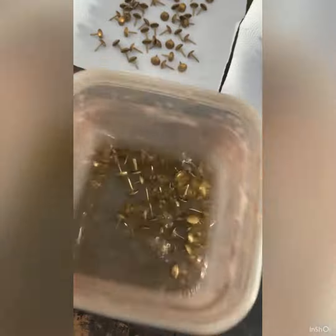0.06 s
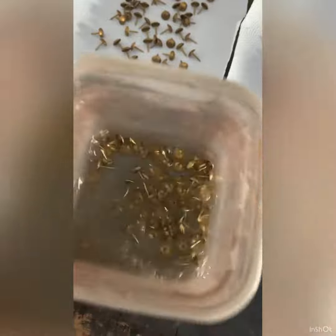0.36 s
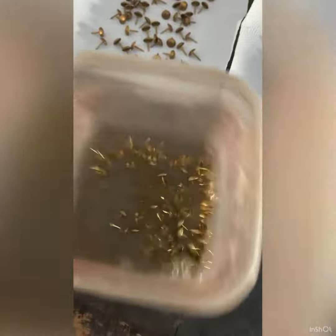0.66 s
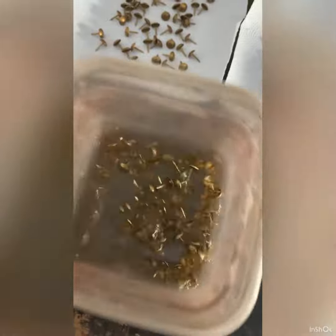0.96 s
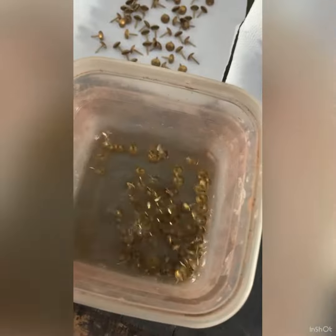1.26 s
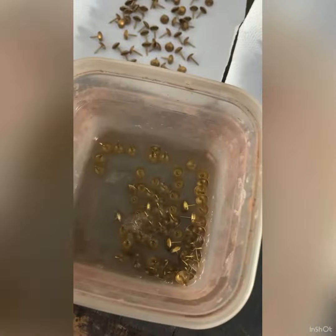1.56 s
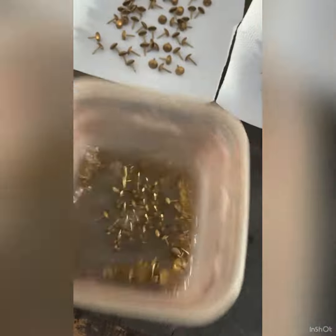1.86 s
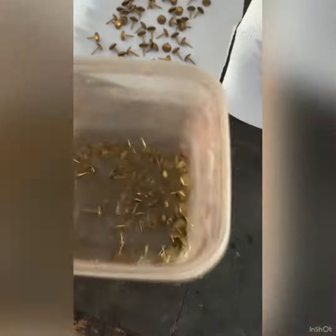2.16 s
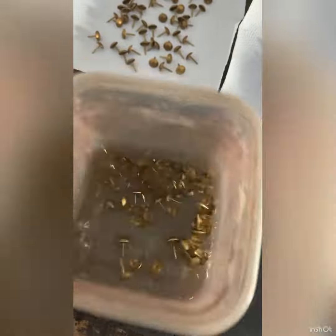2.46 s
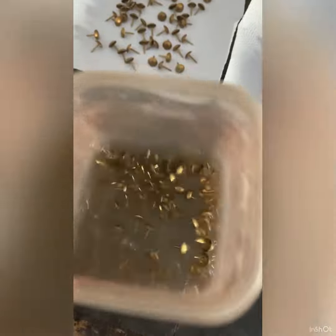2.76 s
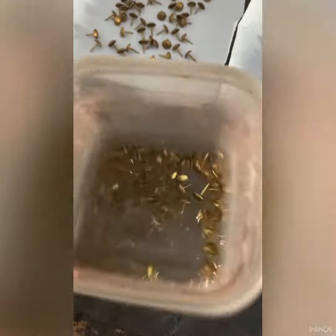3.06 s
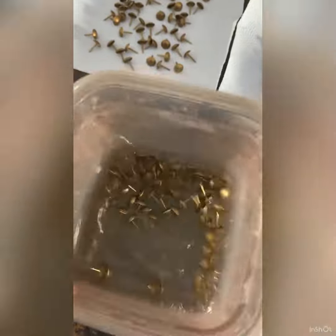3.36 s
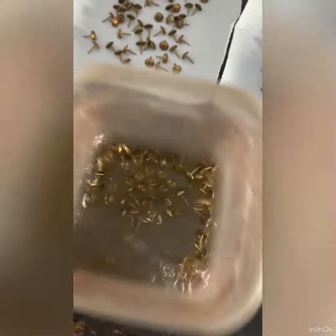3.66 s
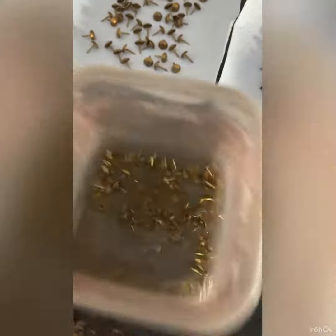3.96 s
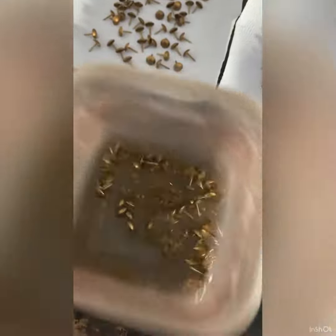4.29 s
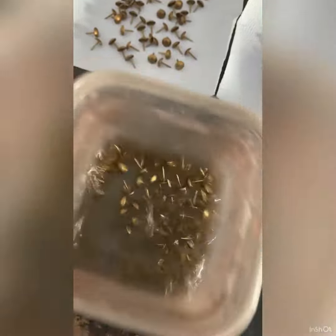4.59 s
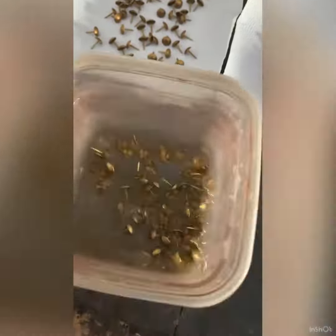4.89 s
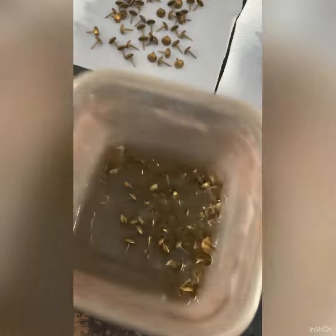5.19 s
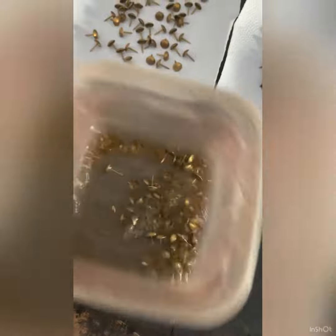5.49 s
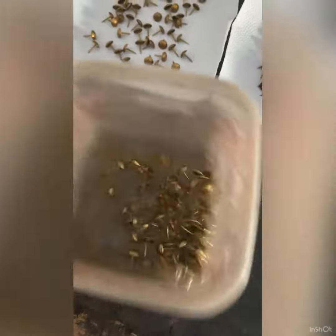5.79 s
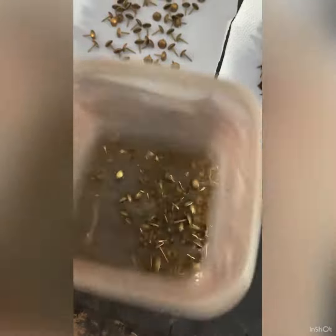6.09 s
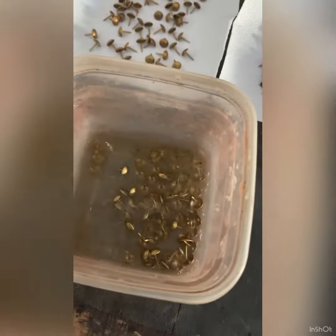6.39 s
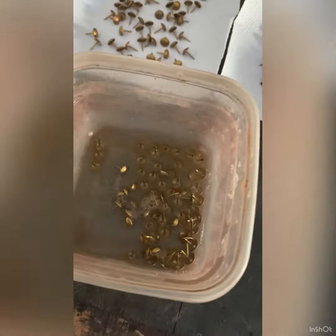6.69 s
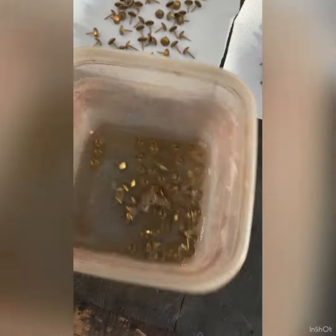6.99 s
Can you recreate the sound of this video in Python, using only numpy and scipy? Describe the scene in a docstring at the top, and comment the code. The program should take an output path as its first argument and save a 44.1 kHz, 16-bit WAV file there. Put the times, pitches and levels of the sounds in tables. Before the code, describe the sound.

Close to the microphone, small metal tacks in a little liquid are shaken quickly to and fro in a plastic tub. They tinkle against each other, drum on the plastic and churn up bubbles. The shaking pauses briefly with a few settling ticks, resumes for a longer spell, then stops as the last tacks settle. A workshop hums faintly behind.

```python
"""A workshop, humming faintly. Close to a two-port stereo microphone, a plastic tub of small metal
tacks in a little liquid is shaken to and fro, rested, shaken again and rested. At every turn the heap
surges against a wall: tacks tinkle on each other, drum on the plastic and churn up bubbles.
In the pauses the last tacks settle with faint ticks. A short room tail sits behind the direct sound."""
import sys
import numpy as np
from scipy import signal
from scipy.fft import rfft, irfft, next_fast_len
from scipy.io import wavfile

SR = 44100
rng = np.random.default_rng(int(sys.argv[2]) if len(sys.argv) > 2 else 0)


def generate_wav(signal):
    """Clip the signal to [-1, 1] and save it as 16-bit WAV at the path in sys.argv[1]."""
    frames = np.transpose(np.atleast_2d(signal))
    scaled = np.clip(frames, -1, 1) * 32767
    pcm = np.round(scaled).astype(np.int16)
    wavfile.write(sys.argv[1], SR, pcm)


N = 310464

# modes of a wet tack: pitch_hz, width_hz, energy_db
TACK_MODES = [(3873, 130, -4), (5240, 2100, -16), (5535, 120, 0.5), (6140, 210, 6.5), (6920, 420, -2),
              (8040, 260, -4.5), (9200, 530, -31.5), (9830, 130, -4.5), (10780, 580, -5),
              (12070, 460, -8.5), (14300, 500, -10), (14800, 700, -8.5)]


def amp(db):
    """Decibels to amplitude."""
    return 10 ** (np.asarray(db) / 20)


def unit(x):
    """Scale to rms 1."""
    return x / np.sqrt(np.mean(x ** 2) + 1e-20)


def peaked(x):
    """Scale to peak 1."""
    return x / np.abs(x).max()


def along(points, hz):
    """Read a curve of (hz, value) points on a log frequency axis."""
    point_hz, values = np.transpose(points)
    return np.interp(np.log(hz + 1), np.log(point_hz + 1), values)


def filtered(x, response):
    """Apply a complex frequency response."""
    size = next_fast_len(N + SR // 2)
    return irfft(rfft(x, size) * response(np.fft.rfftfreq(size, 1 / SR)), size)[..., :N]


def rolled_off(wave, kind, edge_hz):
    """A gentle low-pass or high-pass."""
    return signal.lfilter(*signal.butter(2, min(edge_hz, SR / 3), kind, fs=SR), wave)


def noise(spectrum):
    """Noise of rms 1, coloured by (hz, db) points."""
    return unit(filtered(rng.standard_normal(N), lambda hz: amp(along(spectrum, hz))))


def add(track, start_s, sound):
    """Mix a sound into the track."""
    part = track[..., max(round(start_s * SR), 0):][..., :sound.shape[-1]]
    part += sound[..., :part.shape[-1]]


def workshop():
    """Room tone: steady rumble, mostly common to both ports, with hiss and a machine hum."""
    # colour of the room rumble: frequency_hz, relative_db
    air_colour = [(25, -15.5), (55, -1), (105, 3), (190, -8.5), (315, 4), (600, -12), (1800, -16.5),
                  (3200, -23.5), (5000, -66), (9000, -69.5)]
    # tones of the machine: pitch_hz, level_db
    hum_tones = [(59.2, -64), (134, -65)]
    hiss_colour = [(100, -0.5), (1500, 18.0), (3500, 2.5), (6000, -5.0), (15000, -23.5)]
    t = np.arange(N) / SR
    air = noise(air_colour) + amp(-8.5) * np.array([noise(air_colour), noise(air_colour)])
    hiss = np.array([noise(hiss_colour), noise(hiss_colour)])
    hum = sum(amp(db) * np.sqrt(2) * np.sin(2 * np.pi * hz * t) for hz, db in hum_tones)
    return amp(-58.5) * air + amp(-65.5) * hiss + hum


def hand(hold_db=-65, grip_db=-49, grip_s=1.76, half_length_s=0.082):
    """The hand rumbles faintly on the tub, and louder as a new grip flexes it."""
    t = np.arange(N) / SR
    flex = amp(hold_db) + amp(grip_db) / (1 + ((t - grip_s) / half_length_s) ** 2)
    return flex * noise([(25, -11.0), (55, -2.0), (80, 3.5), (160, 1.0), (260, -7), (800, -59.5)])


def room(near, block=8192):
    """A short diffuse tail, different at each port and from moment to moment; bass lasts longest."""
    # decay of the room: frequency_hz, t60_s
    decay_times = [(200, 1.3), (2000, 0.37), (6000, 0.13), (15000, 0.34)]
    # the tail against the direct sound: frequency_hz, level_db
    tail_levels = [(200, -21.5), (800, -14.5), (1300, -15), (1800, -2), (3000, -9), (5000, -47),
                   (12000, -21)]
    sent = filtered(near.mean(axis=0), lambda hz: amp(along(tail_levels, hz)))
    out = np.zeros((2, N))
    for at in range(0, N, block):
        hz, t, spectra = signal.stft(rng.standard_normal((2, SR // 2)), SR, nperseg=256)
        decay = amp(-60 * t / along(decay_times, hz)[:, None])
        tail = signal.istft(spectra * decay, SR, nperseg=256)[1]
        tail /= np.linalg.norm(tail[0])
        add(out, at / SR, signal.fftconvolve(sent[None, at:at + block], tail, axes=1))
    return out


def ports(near):
    """The direct sound reaches the two microphone ports at different times and strengths."""
    # phase between the ports: frequency_hz, left_lead_rad
    phases = [(0, 0), (1000, -1.2), (1200, -.65), (1650, -.4), (2400, 1.8), (3500, 1.4), (4600, 3.14),
              (6900, 6.28), (8900, 9.42), (11100, 12.57), (13200, 15.7), (16400, 20.3)]
    # balance of the ports: frequency_hz, left_minus_right_db
    balance = [(100, -1.5), (700, -1), (1050, -4.5), (1250, 1.5), (1800, -7), (3000, 0), (4400, -0.5)]

    def left(hz):
        return amp(along(balance, hz) / 2) * np.exp(0.5j * np.interp(hz, *np.transpose(phases)))

    return filtered(near, lambda hz: np.array([left(hz), 1 / left(hz)]))


def damped(modes, factor):
    """The same modes, dying faster (factor above 1) or slower."""
    return [(hz, width * factor, db) for hz, width, db in modes]


def ring(modes, detune, scatter_db, walls_db, walls_t60_s, size=1500):
    """One contact, energy 1: each spot that is struck gives the modes new strengths, signs and pitches."""
    hz, width, db = np.transpose(modes)[:, :, None]
    pitch, level, side = rng.standard_normal((3, len(modes), 1))
    t = np.arange(size) / SR
    strength = np.sign(side) * amp(db + scatter_db * level) * np.sqrt(width)
    tones = np.cos(2 * np.pi * hz * np.exp(detune * pitch) * t)
    wave = np.sum(strength * np.exp(-np.pi * width * t) * tones, axis=0)
    # bounces between the tub's close walls smear the sound; a small part differs from port to port
    bounces = rng.standard_normal(size) + amp(-13) * rng.standard_normal((2, size))
    bounces *= amp(-60 * t / walls_t60_s)
    smear = signal.fftconvolve(wave[None], bounces / np.linalg.norm(bounces[0]), axes=1)[:, :size]
    return unit(wave + amp(walls_db) * smear) / np.sqrt(size)


def crack(t60_s, edge_hz=3200, size=1500):
    """The dry snap of a point striking a head, energy 1."""
    burst = rng.standard_normal(size) * amp(-60 * np.arange(size) / SR / t60_s)
    burst = rolled_off(rolled_off(burst, "high", edge_hz), "low", edge_hz=13000)
    return burst / np.linalg.norm(burst)


def soft_tick():
    """A tack under the liquid tips against its neighbour: choked ring, weak snap, dulled top."""
    choked = ring(damped(TACK_MODES, 1.8), detune=0.037, scatter_db=6, walls_db=4, walls_t60_s=0.028)
    snap = amp(-9.5) * crack(t60_s=0.007)
    return peaked(rolled_off(choked + snap, "low", edge_hz=12000))


def settling(faint_per_s=8, faint_db=-60, spread_db=4):
    """Ticks of the resting heap, and fainter ones at random throughout as loose tacks tip over."""
    # the heap settles or stirs: start_s, level_db
    ticks = [(1.3, -25), (1.311, -30), (1.331, -38), (1.377, -53), (1.405, -50), (1.414, -45), (1.433, -44),
             (1.496, -46), (1.518, -48), (1.722, -39.5), (1.76, -33), (6.365, -28), (6.385, -27),
             (6.398, -28), (6.4363, -33), (6.4574, -37), (6.511, -42), (6.517, -47), (6.612, -48),
             (6.617, -44), (6.751, -51), (6.802, -48), (6.899, -58), (6.966, -42), (6.987, -37),
             (7.01, -32)]
    out = np.zeros((2, N))
    for start_s, db in ticks:
        add(out, start_s, amp(db) * soft_tick())
    for at in np.flatnonzero(rng.random(N) < faint_per_s / SR):
        add(out, at / SR, amp(faint_db + spread_db * rng.standard_normal()) * soft_tick())
    return out


def sliding(steady_db=-30, stir_db_per_s=319.5):
    """Power of tacks sliding over the bottom: steady while shaken, quick to start, slower to settle."""
    # spells of shaking: start_s, stop_s, settle_db_per_s
    spells = [(-.2, 1.201, 164.5), (1.821, 6.202, 112.5)]
    t = np.arange(N) / SR
    drops_db = [stir_db_per_s * np.maximum(start - t, 0) + settle * np.maximum(t - stop, 0)
                for start, stop, settle in spells]
    return amp(steady_db - np.min(drops_db, axis=0)) ** 2


def surge(start_s, rise_s, db, sharpness=1.304):
    """Power of the heap running into a wall: it piles up in the rise time, then ebbs."""
    age = (np.arange(SR // 3) / SR - min(start_s, 0)) / rise_s
    return (amp(db) * (age * np.exp(1 - age)) ** sharpness) ** 2


def shaking(slide_drum_db=-3, back_drum_db=-4.5, back_rise_s=0.025, drum_lead_s=0.0077):
    """Power of the tinkling and of the drumming: sliding, plus a surge at each push and swing back."""
    # one row per to-and-fro of the hand, about 5.5 a second; drum levels are plastic against tacks:
    # start_s, push_rise_s, push_db, back_delay_s, back_db, push_drum_db
    shakes = [(-0.035, 0.031, -23, 0.1, -23, -1), (0.146, 0.039, -24, 0.1, -24.5, -3.5),
              (0.314, 0.042, -25.5, 0.12, -23.5, -4), (0.497, 0.039, -23.5, 0.1, -19.5, -2.5),
              (0.668, 0.048, -24, 0.1, -23.5, -0.5), (0.84, 0.046, -27, 0.098, -23.5, -2),
              (1.014, 0.031, -24.5, 0.081, -26, -5.5), (1.802, 0.033, -29, 0.11, -28.5, -2.5),
              (1.985, 0.04, -20.5, 0.1, -24.5, -4), (2.154, 0.043, -18.5, 0.13, -29, -5.5),
              (2.329, 0.047, -21.5, 0.12, -26, -5), (2.51, 0.035, -21, 0.11, -29.5, -3.5),
              (2.695, 0.039, -20.5, 0.099, -35, -5), (2.885, 0.042, -21, 0.088, -27, -2),
              (3.055, 0.044, -24.5, 0.11, -25.0, -4), (3.242, 0.042, -20.5, 0.12, -23, -4.5),
              (3.43, 0.045, -20, 0.11, -23.5, -8), (3.611, 0.044, -19.5, 0.11, -24.5, -4),
              (3.787, 0.047, -23.5, 0.13, -29.5, -4), (3.974, 0.043, -22, 0.12, -23, -4.0),
              (4.153, 0.036, -25, 0.1, -24.5, -1), (4.321, 0.043, -21, 0.12, -22.5, -5),
              (4.503, 0.049, -23.5, 0.109, -28.5, -4.5), (4.686, 0.045, -21, 0.12, -23.5, -5),
              (4.882, 0.035, -22.5, 0.11, -22, -3), (5.069, 0.039, -22.5, 0.11, -23, -3.5),
              (5.267, 0.048, -24, 0.11, -28, -4.5), (5.445, 0.041, -23.0, 0.11, -22, -4.5),
              (5.634, 0.053, -25.5, 0.103, -23, -3), (5.803, 0.05, -22, 0.12, -26.5, -4.5),
              (5.98, 0.038, -24.5, 0.1, -24.5, -2.5), (6.153, 0.035, -27, 0.11, -37.5, -2),
              (7, 0.057, -35.5, 0.1, -26.0, -3)]
    tinkle = sliding()
    drum = tinkle * amp(slide_drum_db) ** 2
    for start_s, push_rise_s, push_db, back_delay_s, back_db, push_drum_db in shakes:
        push = (start_s, push_rise_s, push_db, push_drum_db)
        swing_back = (start_s + back_delay_s, back_rise_s, back_db, back_drum_db)
        for stroke_s, rise_s, db, drum_db in (push, swing_back):
            add(tinkle, stroke_s, surge(stroke_s, rise_s, db))
            wall_s = stroke_s - drum_lead_s  # the front of the heap meets the wall before the rest
            add(drum, wall_s, surge(wall_s, rise_s, db + drum_db))
    return tinkle, drum


def bubble(hz, cycles, glide):
    """One bubble: a soft start, then its pitch rises as it dies."""
    turns = hz * np.arange(SR // 16) / SR
    age = turns / cycles
    tone = np.sin(2 * np.pi * turns * (1 + glide * np.minimum(age, 1)))
    return tone * amp(-40 * age) * (1 - np.exp(-turns))


def slosh(power, middle_hz=779, spread=0.368, count=1300):
    """Bubbles of many sizes, as loud as the liquid is stirred, and a few loud ones where it slaps a wall."""
    # bubbles that stand out: start_s, pitch_hz, level_db
    plops = [(0.185, 1163, -12), (0.52, 900, -15.5), (0.859, 900, -14), (2.534, 1027, -13.5),
             (2.893, 960, -8.5), (3.457, 850, -15), (4.532, 910, -6.5), (4.556, 490, -21.5),
             (4.907, 830, -14), (5.115, 400, -24.5), (5.318, 426, -23.5), (5.851, 1106, -17),
             (5.93, 2400, -14.5)]
    fizz = np.zeros(N)
    for at, (pitch, level) in zip(rng.integers(N, size=count), rng.standard_normal((count, 2))):
        hz = middle_hz * np.exp(spread * np.clip(pitch, -2, 2))
        add(fizz, at / SR, amp(5 * level) * bubble(hz, cycles=15.8, glide=0.19))
    out = amp(-15.5) * unit(fizz) * np.sqrt(power)
    for start_s, hz, db in plops:
        add(out, start_s, amp(db) * bubble(hz, cycles=23.5, glide=0.045))
    return out


def rattle(power, contacts, rate, spread_db, crowding):
    """Random collisions, `rate` a second at mean power; a livelier heap hits more often and harder."""
    chance = np.clip(rate / SR * (power / power.mean()) ** crowding, 2e-3, 1)
    scatter = unit(amp(spread_db * np.clip(rng.standard_normal(N), -2, 2)))
    strength = scatter * np.sqrt(power / chance)
    spot = rng.integers(len(contacts), size=N)
    out = np.zeros((2, N))
    for at in np.flatnonzero(rng.random(N) < chance):
        add(out, at / SR, strength[at] * contacts[spot[at]])
    return out


def tub(power, count=400):
    """Tacks drum on the plastic, whose pitch shifts with the liquid on it; at times a whole clump lands."""
    # modes of the loaded tub: pitch_hz, width_hz, energy_db
    tub_modes = [(219.8, 23, -15.5), (350, 86, -11.5), (548, 50, -11), (722, 180, -5.5), (840, 91, 4),
                 (959, 115, 2.5), (1098, 170, -4.5), (1587, 150, -11.5), (1819, 100, -9), (2450, 330, -6.5),
                 (3207, 180, -6)]
    # clumps knock on the plastic, harder ones brighter: start_s, level_db, tilt_db_per_octave
    knocks = [(0.077, -22, 2), (0.191, -16, -11), (0.467, -12.5, 4), (0.616, -11, 3), (0.904, -14, 5),
              (1.036, -13, 4), (1.115, -19.5, -1), (1.1297, -16, 14), (1.268, -27.5, -7),
              (1.29, -33.5, -10), (1.752, -34, -2), (1.842, -16, 4), (1.882, -19.5, 5), (2.083, -11, 3),
              (2.539, -12.5, -0.5), (2.838, -22, 2), (2.895, -16, -3), (2.9365, -15.5, -3),
              (3.649, -12, 0.5), (4.486, -18, 5), (4.532, -10, -4.5), (4.554, -14.5, 2), (4.789, -16, 3),
              (5.195, -13.5, 4), (5.315, -17.5, -4), (5.858, -9.5, -2)]
    contacts = [ring(tub_modes, detune=0.059, scatter_db=3, walls_db=-5, walls_t60_s=0.011)
                for _ in range(count)]
    out = amp(-0.88) * rattle(power, contacts, rate=1000, spread_db=0.3, crowding=0.4)
    lowest_hz = tub_modes[0][0]
    for start_s, db, tilt in knocks:
        tilted = [(hz, width, level + tilt * np.log2(hz / lowest_hz)) for hz, width, level in tub_modes]
        knock = ring(tilted, detune=0.014, scatter_db=2, walls_db=-2, walls_t60_s=0.009)
        knock = rolled_off(knock, "low", edge_hz=2200)  # the liquid cushions the landing
        knock = rolled_off(knock, "high", edge_hz=520)  # the thin wall gives little low end
        add(out, start_s, amp(db) * peaked(knock))
    return rolled_off(out, "high", edge_hz=134)  # so small a tub radiates little bass


def hard_hit(snap_hz):
    """A tack lands squarely: a brief ring under a snap that is stronger the brighter it is."""
    snap = (snap_hz / 5500) ** 1.6 * crack(t60_s=0.0055, edge_hz=snap_hz)
    clink = ring(damped(TACK_MODES, 1.4), detune=0.03, scatter_db=1.5, walls_db=0, walls_t60_s=0.006)
    return peaked(clink + snap)


def tacks(power, count=200):
    """A dense tinkle of wet heads, clinks of those lifted clear, snaps of points and single hard hits."""
    # sharp hits of tack on tack: start_s, level_db, snap_edge_hz
    hits = [(0.444, -10.5, 4000), (0.464, -11.5, 6900), (0.7603, -21, 4000), (0.862, -12.5, 4000),
            (1.1224, -12, 5000), (1.131, -4, 6520), (1.229, -20, 4000), (1.2782, -13.5, 4000),
            (1.291, -19, 4000), (1.819, -14, 4000), (1.8315, -8, 8000), (1.8384, -12.5, 4000),
            (2.029, -5, 4000), (2.118, -8.5, 4000), (2.71, -11.5, 6000), (2.754, -9, 4000),
            (2.837, -11, 7000), (2.908, -6.5, 4000), (2.9544, -20, 4000), (3.106, -14, 4000),
            (3.2043, -13, 4000), (3.269, -10, 4000), (3.384, -7.5, 4000), (3.396, -7.5, 7000),
            (3.6497, -7, 7400), (3.6512, -3.5, 5000), (3.824, -5, 4000), (3.9372, -13, 6000),
            (4.0135, -4.5, 4000), (4.0376, -10, 4000), (4.112, -7, 4000), (4.4858, -7, 4000),
            (4.5927, -6, 6000), (4.64, -9, 4000), (4.7348, -4, 4000), (4.849, -10.5, 4000),
            (4.9428, -9, 7000), (5.08, -10, 4000), (5.182, -5, 4000), (5.4, -9, 4000), (5.4212, -10, 12000),
            (5.58, -4, 5000), (5.703, -9, 4000), (5.7435, -7, 4000), (5.883, -6, 4000), (6.023, -9.5, 4000),
            (6.1816, -12, 4000), (6.2478, -15, 4000)]
    wet = [ring(TACK_MODES, detune=0.037, scatter_db=5, walls_db=-3, walls_t60_s=0.032)
           for _ in range(count)]
    lifted = [ring(damped(TACK_MODES, 0.2), detune=0.06, scatter_db=6, walls_db=-7, walls_t60_s=0.0065)
              for _ in range(count)]
    points = [crack(t60_s=0.0028) for _ in range(count // 4)]
    out = amp(-2.5) * rattle(power, wet, rate=1600, spread_db=2, crowding=0.38)
    out += amp(-4.5) * rattle(power, lifted, rate=190, spread_db=3, crowding=0.38)
    out += amp(-20) * rattle(power, points, rate=95, spread_db=3.5, crowding=0.097)
    for start_s, db, snap_hz in hits:
        add(out, start_s, amp(db) * hard_hit(snap_hz))
    return rolled_off(out, "high", edge_hz=570)


def scene():
    """Tacks, tub and liquid, heard close up and through the room, over room tone and handling noise."""
    tinkle_power, drum_power = shaking()
    near = tacks(tinkle_power) + tub(drum_power) + slosh(drum_power) + settling()
    return ports(near) + room(near) + workshop() + hand()


def record(dry):
    """The microphone cuts off steeply at its band limit."""
    limit_hz = 15800
    return filtered(dry, lambda hz: 1 / np.sqrt(1 + (hz / limit_hz) ** 200))


dry = scene()
out = record(dry)
generate_wav(out)
```